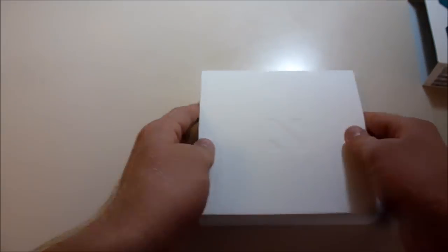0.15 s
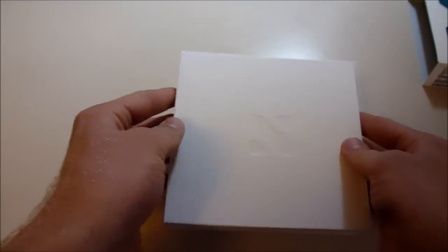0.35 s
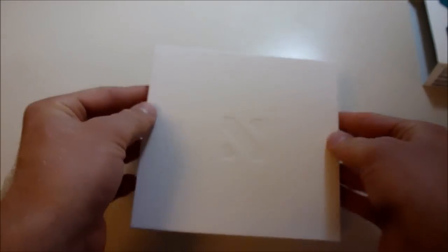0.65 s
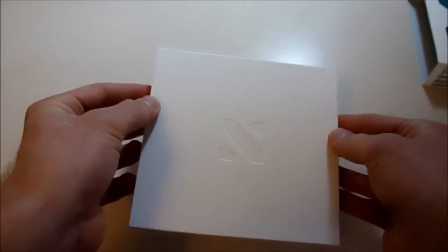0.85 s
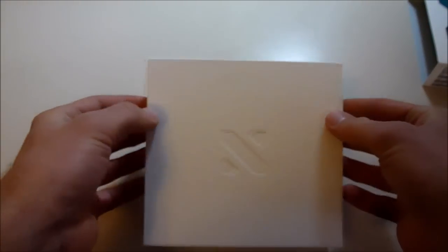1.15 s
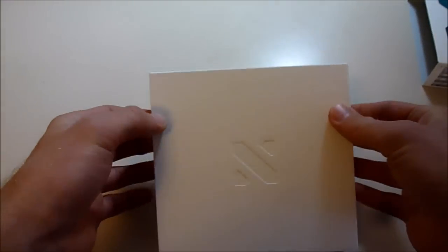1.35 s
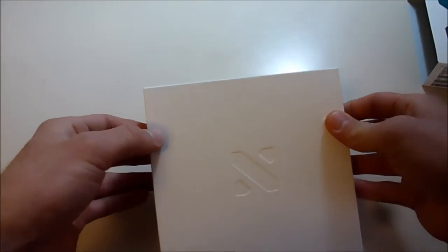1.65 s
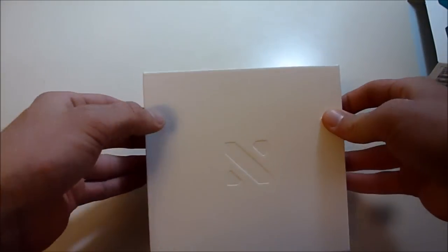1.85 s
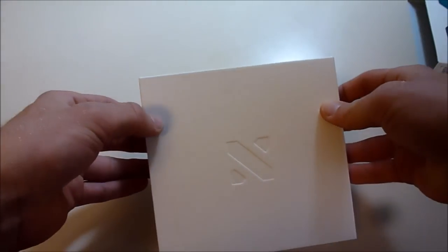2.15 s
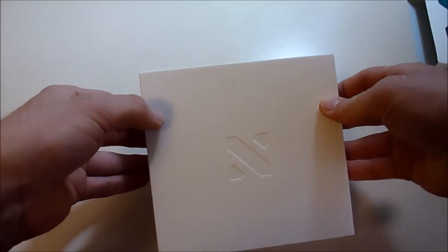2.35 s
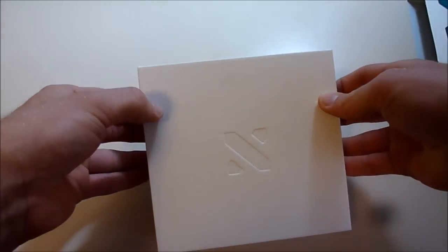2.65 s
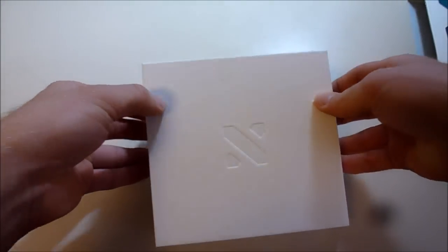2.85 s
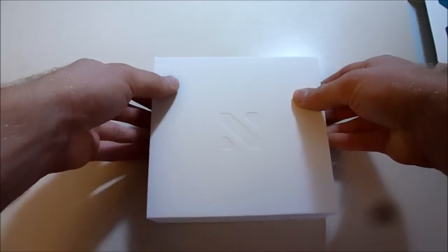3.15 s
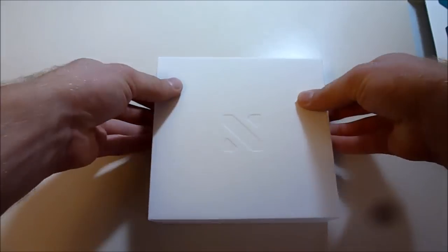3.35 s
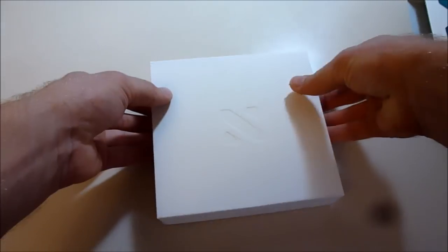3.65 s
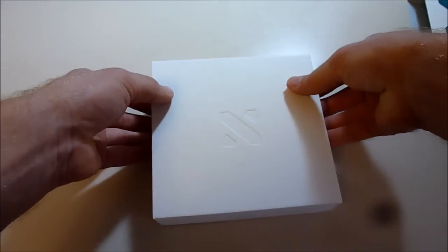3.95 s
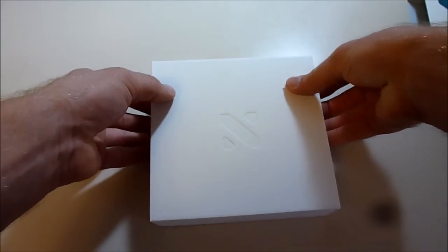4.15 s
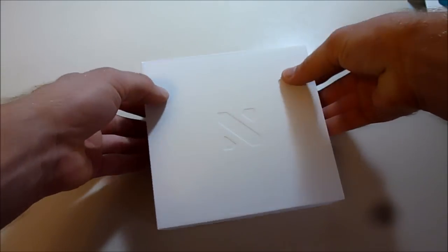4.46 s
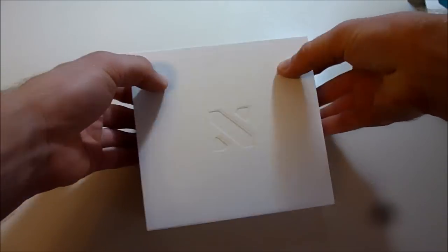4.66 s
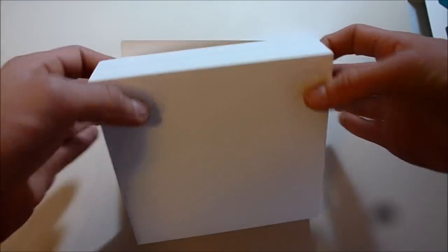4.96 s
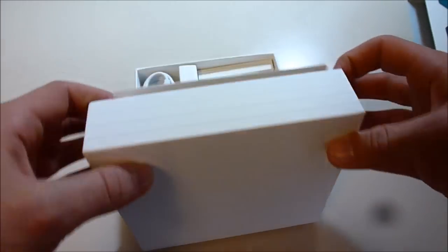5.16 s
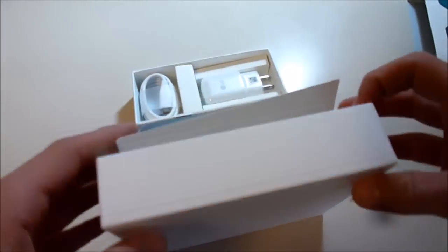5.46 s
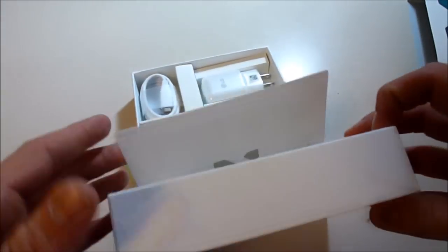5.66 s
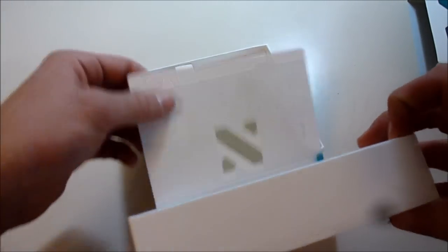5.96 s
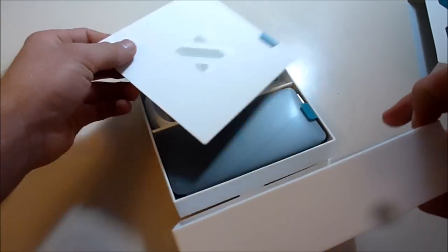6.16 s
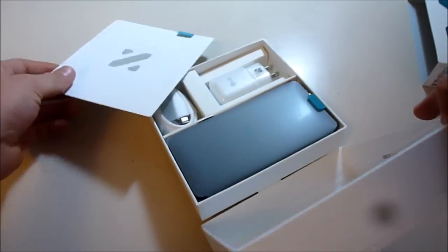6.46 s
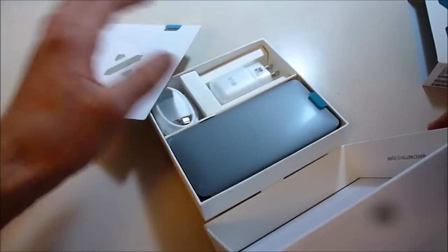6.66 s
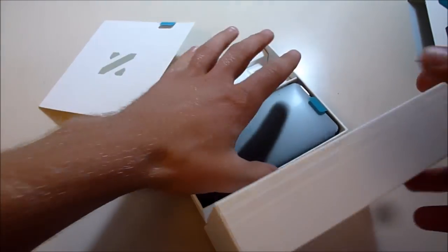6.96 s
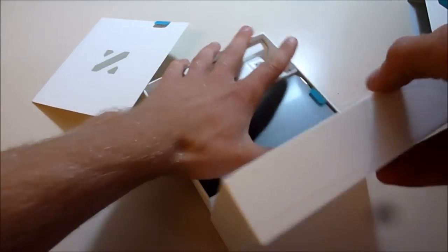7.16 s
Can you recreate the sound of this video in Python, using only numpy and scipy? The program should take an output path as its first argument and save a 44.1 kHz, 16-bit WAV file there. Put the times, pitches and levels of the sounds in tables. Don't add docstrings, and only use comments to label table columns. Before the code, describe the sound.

A snug cardboard box lid is worked loose by hand, with hollow knocks, dry scrapes and one loud crack, then light card ticks and brushing.

```python
import sys
import numpy as np
from scipy import signal
from scipy.fft import rfft, irfft
from scipy.io import wavfile
from scipy.ndimage import uniform_filter1d

SR = 44100
rng = np.random.default_rng(int(sys.argv[2]) if len(sys.argv) > 2 else 0)


def volts_from_decibels(level):
    exponent = np.asarray(level, float) / 20
    return 10 ** exponent


def wrap_up_sound(samples):
    columns = np.atleast_2d(samples).T
    tamed = np.clip(columns, -1, 1)
    steps = np.round(tamed * 32767).astype(np.int16)
    wavfile.write(sys.argv[1], SR, steps)


N = 321930


def level(x, db):
    return x * volts_from_decibels(db) / np.sqrt(np.mean(x ** 2) + 1e-18)


def band(x, lo_hz, hi_hz, order=2):
    return signal.sosfilt(signal.butter(order, [lo_hz, hi_hz], "band", fs=SR, output="sos"), x)


def colour(x, points):
    hz, db = np.transpose(points)
    f = np.arange(len(x) // 2 + 1) * SR / len(x) + 1
    gain_db = np.interp(np.log(f), np.log(hz), db)
    return irfft(rfft(x) * volts_from_decibels(gain_db), len(x))


def ring(x, modes, damp=0.89, stretch=0.96, boost_db=0.):
    stretches = stretch * np.ones(len(modes))
    boosts_db = boost_db + np.zeros(len(modes))
    out = 0
    for k, ((hz, width, db), s, b) in enumerate(zip(modes, stretches, boosts_db)):
        r = np.exp(-np.pi * width * damp / SR)
        swing = [1, -2 * r * np.cos(2 * np.pi * hz * s / SR), r * r]
        out = out + (-1) ** k * volts_from_decibels(db + b) * signal.lfilter([1 - r, 0, r - 1], swing, x)
    return out


def walk(rate):
    k = int(SR / rate)
    held = np.repeat(rng.standard_normal(N // k + 1), k)
    steps = uniform_filter1d(uniform_filter1d(held, k), k)[:N]
    return steps / steps.std()


def slips(rate, spread_db):
    chance, sign = rng.random(N), rng.standard_normal(N)
    size_db = spread_db * np.minimum(rng.exponential(size=N), 3)
    return (chance < rate / SR) * np.sign(sign) * volts_from_decibels(size_db)


# (frequency [Hz], level [dB per Hz])
AIR = [(35, -45), (60, -11), (349, 12.5), (768, -23.5), (940, 14.5), (1330, -13), (4840, -10.5),
       (6420, -20.5), (7550, -43.5), (9820, -81), (16600, -120)]


def still_air():
    return level(colour(rng.standard_normal(N), AIR), -54.5)


def room(x):
    t60_s, tail_db, top_hz = 0.11, -15, 2800
    t = np.arange(int(.4 * SR)) / SR
    noise = band(rng.standard_normal(len(t)), 70, top_hz, order=1)
    tail = noise * 1000 ** (-t / t60_s) * (t > .004)
    return signal.fftconvolve(x, tail / np.sqrt(np.sum(tail ** 2)))[:N] * volts_from_decibels(tail_db)


# (time [s], level [dB], centre [Hz], ring t60 [s])
CRACKS = [(0.1196, -23.5, 3010, 0.05), (0.1421, -18, 2840, 0.043), (0.4594, -28, 2230, 0.035),
          (0.6524, -33.5, 2660, 0.048), (0.764, -28.5, 4050, 0.056), (1.042, -32, 3960, 0.046),
          (1.252, -33, 3320, 0.036), (1.4043, -33, 2500, 0.036), (2.319, -29, 2490, 0.029),
          (2.8755, -32.5, 2600, 0.04), (3.0689, -27, 2660, 0.048), (3.132, -29.5, 2480, 0.04),
          (3.184, -22.5, 2950, 0.028), (3.267, -32, 3180, 0.058), (3.335, -34.5, 3180, 0.048),
          (3.3896, -33, 2600, 0.036), (3.46, -27, 3110, 0.033), (3.5074, -20.5, 3120, 0.049),
          (3.5346, -18.5, 3250, 0.047), (3.7863, -29.5, 3430, 0.028), (4.1724, -32.5, 2900, 0.033),
          (4.1852, -34.5, 3120, 0.044), (4.2106, -23.5, 2200, 0.035), (4.2693, -28, 2560, 0.03),
          (4.3233, -27.5, 2610, 0.035), (4.4792, -17, 2640, 0.04), (4.5144, -4.5, 2280, 0.022),
          (4.571, -21, 3280, 0.04), (4.5883, -15, 2530, 0.033), (4.6854, -13.5, 2330, 0.051),
          (4.811, -22.5, 2590, 0.073), (4.8998, -31, 2510, 0.04), (4.9254, -22.5, 2200, 0.03),
          (5.1467, -27.5, 2420, 0.027), (5.5987, -28.5, 2870, 0.04), (5.7094, -27, 2930, 0.035),
          (5.7688, -29, 2470, 0.062), (5.9383, -27, 2600, 0.054), (5.9655, -23.5, 3160, 0.026),
          (5.9854, -15, 2710, 0.062), (6.263, -14, 2600, 0.05), (6.3923, -32, 3730, 0.049),
          (6.4606, -27, 4200, 0.068), (6.5933, -19.5, 2330, 0.027), (6.665, -25.5, 2410, 0.04),
          (6.6802, -19, 3150, 0.04), (6.8575, -36, 2320, 0.036), (6.981, -34, 2200, 0.056)]
# (time [s], level [dB], centre [Hz], ring t60 [s])
REBOUNDS = [(.117, -27, 850, 0.063), (0.15, -24.5, 1324, 0.074), (0.248, -27, 328, .07),
            (0.29, -41, 3130, 0.026), (1.155, -30, 412, 0.073), (1.248, -36, 210, .1),
            (1.396, -32.5, 566, 0.025), (1.419, -19.5, 550, 0.04), (1.435, -27.5, 790, .04),
            (5.147, -34.5, 3550, 0.021), (1.86, -38, 496, 0.13), (2.075, -39, 500, 0.12),
            (2.14, -34, 514, 0.105), (2.37, -40, 520, 0.053), (2.56, -36.5, 530, 0.073),
            (4.199, -42, 1000, .02), (3.075, -34, 430, .15), (4.33, -41, 556, .15),
            (4.843, -31.5, 950, 0.043), (4.606, -15.5, 550, 0.075), (5.157, -33.5, 640, .08),
            (5.43, -46, 182, .1), (5.607, -31.5, 346, .08), (5.712, -34.5, 1610, .08),
            (5.865, -33, 1610, 0.036), (5.87, -41.5, 375, .1), (6.275, -26, 744, 0.051),
            (6.475, -36, 4100, 0.14), (6.599, -28, 1640, 0.092), (0.2053, -38.5, 5470, 0.0099),
            (.78, -30, 505, .08), (.855, -34.5, 1000, 0.076), (3.1, -39, 430, 0.097), (3.7, -31, 570, .08),
            (4.225, -31, 340, 0.05), (4.645, -28, 560, .06), (.717, -32, 1900, .05), (.832, -30, 900, .02),
            (1.418, -32.5, 2800, .06), (3.135, -23, 400, .06), (6.03, -30.5, 398, 0.075),
            (4.872, -36, 1000, .03), (1.5, -46, 171, .15)]


def fibres():
    out, t = np.zeros(N + 8192), np.arange(8192) / SR
    rows = [(s, db - 7, hz, t60, 0.2, .0002) for s, db, hz, t60 in CRACKS]
    rows += [(*row, 0.13, .002) for row in REBOUNDS]
    for (s, db, hz, t60, width, rise_s), noise in zip(rows, rng.standard_normal((len(rows), 8192))):
        push = noise * 1000 ** (-t / max(t60, .005)) * (1 - np.exp(-t / rise_s))
        burst = ring(push, [(hz, width * hz, 0)], 0.7, 0.98)
        burst = band(burst, hz / 3, min(1.8 * hz, 7000), order=1)
        loudest = np.sqrt(2 * uniform_filter1d(burst ** 2, size=132).max())
        i = int(s * SR)
        out[i:i + 8192] += burst * volts_from_decibels(db) / loudest
    return out[:N]


# (fastest moment [s], level [dB], speeding up [s], slowing [s])
SLIDES = [(.28, -36, 0.05, 0.013), (.65, -42.5, .3, 0.44), (.926, -31, 0.27, 0.074),
          (1.153, -32, .25, 0.054), (1.267, -38, 0.061, 0.084), (1.441, -22, 0.043, 0.05),
          (1.51, -34.5, 0.052, 0.072), (1.87, -38.5, 0.2, 0.32), (2.089, -33.5, 0.072, 0.15),
          (2.428, -34.5, 0.32, 0.24), (2.54, -42, 0.18, 0.043), (2.654, -32.5, .06, 0.093),
          (2.78, -34.5, 0.08, 0.14), (2.861, -40.5, 0.11, .22), (3.11, -43, .2, .05),
          (3.178, -26.5, 0.057, 0.06), (3.332, -37.5, 0.014, 0.082), (3.498, -31, 0.038, 0.18),
          (3.666, -23.5, 0.014, 0.079), (3.757, -48, .08, .13), (4.334, -28, 0.067, 0.34),
          (4.456, -29, 0.062, 0.2), (4.731, -26.5, 0.4, 0.061), (4.909, -23.5, 0.025, 0.043),
          (5.19, -53, 0.12, 0.033), (5.428, -47, 0.042, 0.1), (5.633, -49, 0.079, 0.3),
          (6.04, -32.5, 0.069, 0.027), (6.26, -40, 0.12, 0.28)]
# (fastest moment [s], level [dB], speeding up [s], slowing [s])
SCRAPES = [(.132, -24.5, 0.017, 0.083), (.2, -38, 0.033, 0.052), (.926, -38.5, 0.14, 0.075),
           (2.861, -44, 0.043, 0.2), (3.533, -33, 0.031, 0.088), (3.606, -25, 0.068, 0.025),
           (4.206, -37.5, 0.021, .25), (4.424, -28.5, 0.095, .05), (4.495, -25.5, 0.0099, 0.054),
           (4.6, -31, 0.15, 0.34), (4.809, -40.5, .1, 0.1), (4.94, -19.5, 0.011, .03),
           (4.975, -32, 0.023, 0.09), (5.4, -45.5, 0.15, 0.087), (5.75, -44, 0.19, 1),
           (6.024, -33, 0.023, .02), (6.272, -34, 0.019, 0.059), (6.374, -55, 0.12, 0.27),
           (6.62, -37.5, 0.092, 0.033), (6.698, -33, 0.029, 0.054), (6.73, -46.5, 0.022, 0.31),
           (7.06, -44.5, 0.21, 1)]
# (fastest moment [s], level [dB], speeding up [s], slowing [s])
BRUSHES = [(.003, -36.5, 0.13, 0.19), (.29, -47, 0.51, 0.89), (.7, -45.5, 0.14, 0.11),
           (.865, -41, 0.046, .06), (1.415, -40, 0.018, 0.046), (1.644, -52.5, 0.26, 0.062),
           (1.87, -48.5, 0.055, 0.1), (3.56, -28.5, 0.021, 0.094), (4.225, -43, 0.024, 0.028),
           (4.38, -42.5, 0.056, .05), (4.7, -38, .03, 0.099), (5.05, -42, 0.3, 0.11),
           (5.3, -46, 0.011, .05), (5.4, -42, 0.052, 0.036), (5.633, -54, .17, .2),
           (6.0, -27.5, 0.034, 0.043), (6.29, -34.5, 0.043, 0.034), (6.395, -38, 0.0049, .04),
           (6.422, -33.5, 0.018, 0.02), (6.46, -42, 0.0054, .04), (6.477, -36, 0.035, 0.12),
           (6.579, -40.5, .05, 0.045), (6.698, -34, 0.032, 0.027), (6.88, -42.5, 0.016, 0.018),
           (7.12, -41.5, 0.035, 0.059), (7.29, -40.5, 1, 0.22)]


def strokes(t):
    # (panel [dB], edge [dB], hiss [dB])
    slide, scrape, brush, grip = (0, -11, -17), (-4, 0, -9.5), (-9.5, -14, 0), (-66, -57.5, -53)
    pause_db = -4 * ((t > 3.83) & (t < 4.165))
    power = volts_from_decibels(np.array(grip)[:, None] + pause_db) ** 2
    for rows, shares_db in [(SLIDES, slide), (SCRAPES, scrape), (BRUSHES, brush)]:
        speed = 0
        for s, db, rise, fall in rows:
            away = np.maximum((s - t) / rise, (t - s) / fall)
            speed = speed + volts_from_decibels(db - 15 * away) ** 2
        power = power + volts_from_decibels(np.array(shares_db))[:, None] ** 2 * speed
    return 10 * np.log10(power)


def easing(t, dip_db=-2.0, hold_s=0.15):
    onsets = [s for s, *_, rattle_db in blows() if rattle_db < -4.5]
    onsets = np.array(onsets + [t[-1] + 1])
    until = onsets[np.searchsorted(onsets, t)] - t
    return volts_from_decibels(dip_db * np.exp(-until / hold_s))


# (frequency [Hz], width [Hz], level [dB])
PANEL = [(230, 340, -15), (294.7, 138, 2), (348.2, 37.8, 6), (490, 90, -4), (566, 17, 0.5),
         (754, 250, -10.5)]
# (frequency [Hz], width [Hz], level [dB])
EDGE = [(862, 203, -7.5), (980.4, 93.4, 6), (1080, 153, 4.5), (1200, 167, 1.5), (1460, 117, 3),
        (1553, 302, 1), (2090, 1300, -13.5)]
# (frequency [Hz], width [Hz], level [dB])
RIM = [(2110, 120, -12), (2870, 100, 2), (2870, 240, -0.5), (3640, 69, 7.5), (4140, 240, -7.5),
       (4690, 160, 4), (5420, 89, -13)]
# (frequency [Hz], level [dB per Hz])
HISS = [(880, 1), (1500, 3), (2220, 1), (2590, 2.5), (3760, -1.5), (4670, -7), (5280, -7), (6460, -16),
        (7550, -14), (9820, -40.5), (16600, -120)]


def rubbing():
    t = np.arange(N) / SR
    coarse = t[::44]
    panel_db, edge_db, hiss_db = (np.interp(t, coarse, c) for c in strokes(coarse))
    pressure = walk(30)
    drive = slips(900, 3.0) * volts_from_decibels(2.4 * pressure)
    bend = .5 + .5 * np.tanh(4.3 * uniform_filter1d(pressure[::-1], size=2000))

    def bent(x, modes, damp, db=0.):
        return ring(x * bend, modes, damp, 0.9276, db) + ring(x * (1 - bend), modes, damp, 0.96, db)

    side_walls_db = np.array([-10.5, -12.5, -10.5, -2.5, 1.5, -2])
    panel = level(band(bent(drive, PANEL, 0.96, side_walls_db), 200, 990), -0.84)

    scratch = drive + slips(1500, 3.7)
    hollow_db = np.where(t > 5.03, -1, -8)
    hollow = level(ring(scratch, [(945, 45, 0)]), 0) * volts_from_decibels(2 * walk(12) + hollow_db)
    edge = level(band(bent(scratch, EDGE, 1.64), 560, 2000), -0.12) * volts_from_decibels(walk(50)) + hollow

    skin = level(slips(2500, 3.0), 0) + rng.standard_normal(N)
    hiss = level(band(colour(skin, HISS), 700, 9500), -3)
    hiss = hiss + level(band(bent(skin, RIM, 1.3), 1800, 6500), -8)
    rasp = hiss * volts_from_decibels(hiss_db + 1.6 * pressure + 1.5 * walk(70))
    return easing(t) * (panel * volts_from_decibels(panel_db) + edge * volts_from_decibels(edge_db) + rasp)


# (time [s], peak level [dB], centre [Hz], width [Hz])
STRIKES = [
    (0.1411, -4.5, 1266, 350),
    (1.043, -16, 900, 400),
    (1.4053, -7, 740, 350),
    (3.556, -9, 800, 400),
    (4.5133, -2.5, 1260, 500),
    (4.927, -9.5, 900, 400),
    (6.594, -20, 1600, 800),
    (6.681, -20, 1800, 900),
]


def strikes():
    out, tap = np.zeros(N), np.arange(1024) == 0
    for s, db, hz, width in STRIKES:
        shock = band(ring(1. * tap, [(hz, width, 0)], 0.85, 0.96), 150, 2.4 * hz)
        i = int(s * SR)
        out[i:i + 1024] -= shock * volts_from_decibels(db) / np.abs(shock).max()
    return out


# (time [s], struck spot [Hz], level [dB], edge over panel [dB])
THUDS = [(.143, 1645, -13, 10), (.634, 815, -34, 15), (1.02, 677, -30.5, -2), (1.044, 314, -16.5, -3.5),
         (1.133, 590, -32, 2), (1.406, 542, -14.5, -3), (1.447, 566, -23, -20), (1.514, 685, -33.5, 2),
         (1.975, 530, -35, 4), (2.171, 910, -38, 15), (2.368, 530, -42, -24), (2.528, 575, -33.5, -10),
         (2.639, 552, -29, -17), (2.742, 533, -38, -1), (2.853, 558, -31, -8), (2.877, 935, -25.5, 3),
         (3.557, 518, -12, -6), (5.039, 1064, -23.5, 30), (3.669, 450, -26.5, -24), (4.615, 553, -17, -18),
         (4.694, 782.5, -14.5, 4.5), (4.842, 950, -25.5, 5), (5.116, 1010, -35.5, 18),
         (6.195, 326, -40, -2), (6.665, 1210, -32, 4), (6.86, 977, -30.5, 3), (7.123, 1460, -34, 12)]
# (time [s], struck spot [Hz], level [dB], edge over panel [dB])
TAPS = [(.123, 690, -26, -5.5), (4.48, 1480, -24.5, 16.5), (.241, 308, -28.5, -6), (.715, 790, -43.5, 5),
        (.838, 527, -19, -7), (.871, 567, -28, 7), (.899, 490, -19.5, -5), (.926, 820, -24.5, -27),
        (.99, 473, -34, -1), (1.074, 487, -30, 6.5), (1.315, 490, -33.5, -5), (2.321, 560, -30.5, 4.5),
        (2.61, 497, -36, -6), (3.024, 960, -35, -3), (3.131, 703, -13, -7.5), (3.323, 694, -33.5, -33),
        (3.336, 783, -33.5, 1.5), (3.391, 550, -32, 2), (3.925, 560, -33, -8), (4.021, 1174, -39.5, 2.5),
        (4.212, 490, -17.5, -8), (4.249, 457, -27, 8), (4.39, 990, -27, 7), (4.489, 1560, -20, 16),
        (4.588, 524, -12.5, -6), (4.684, 425, -11.5, -1), (4.927, 574, -12, -1), (5.359, 926, -30.5, 26),
        (5.603, 935, -23.5, 15)]
# (time [s], struck spot [Hz], level [dB], edge over panel [dB])
SNAPS = [(.46, 1043, -34, 8), (.569, 335, -42.5, 4), (.653, 483, -32, -1), (.723, 860, -31.5, 22),
         (.761, 484, -17.5, -10.5), (1.247, 378, -24.5, -14), (3.068, 390, -32, -6),
         (3.185, 1090, -30.5, 15), (3.269, 1080, -42.5, 0), (3.462, 1080, -33, -1),
         (3.508, 1020, -24.5, -4), (3.535, 1620, -26, 2.5), (3.58, 1040, -24.5, 8),
         (3.655, 930, -22.5, -7.5), (3.789, 1080, -37.5, -0.5), (4.173, 956, -39.5, 13),
         (4.187, 996, -35, 9), (4.27, 521, -24, -8), (4.324, 980, -29.5, 3.5), (4.358, 516, -29.5, 16),
         (4.444, 523, -29.5, -1), (4.48, 563, -25, -7.5), (4.514, 567, -8.5, -7.5), (4.571, 726, -30, 22),
         (4.812, 358, -28, 3.5), (4.9, 566, -35.5, -6)]
# (time [s], struck spot [Hz], level [dB], edge over panel [dB])
TICKS = [(5.147, 970, -32.5, 2.5), (5.229, 980, -55, 7), (5.419, 363, -31, -16), (5.545, 950, -41.5, -1),
         (5.689, 1200, -50, 26), (5.709, 977, -34.5, 5), (5.769, 966, -30.5, 33), (5.832, 940, -44, 3),
         (5.937, 840, -39.5, 25), (5.966, 1560, -41.5, -3), (5.986, 1690, -27.5, 14),
         (6.007, 1065, -24.5, 6), (6.257, 830, -23, 16.5), (6.265, 678, -27, -1), (6.39, 905, -35, 9),
         (6.461, 925, -40, 16), (6.566, 1550, -41, 31), (6.594, 1240, -27.5, 2), (6.681, 1330, -26.5, 11),
         (6.982, 1460, -32.5, 9), (7.029, 1330, -52, 12), (7.157, 1020, -38, 24), (7.278, 950, -34, 20)]


def blows():
    # (crack over edge [dB], rattle after a middling -28 dB blow [dB])
    thud, tap, snap, tick = (-16.5, -9.5), (-10, -7.5), (-3, -8.5), (-3, -10)
    out = []
    for rows, (crack_db, rattle_db) in [(THUDS, thud), (TAPS, tap), (SNAPS, snap), (TICKS, tick)]:
        for s, hz, db, over in rows:
            panel_db, edge_db = db - max(over, 0), db + min(over, 0)
            out.append((s, hz, panel_db, edge_db, edge_db + crack_db, rattle_db - 0.27 * (db + 28)))
    return sorted(out)


def knocks():
    out, t = np.zeros(N + 8192), np.arange(8192) / SR
    push = t / .0001 * np.exp(-t / .0001)
    chance = rng.standard_normal((len(blows()), 8192 + 16))
    for (s, hz, panel_db, edge_db, crack_db, rattle_db), c in zip(blows(), chance):
        noise, detune = c[:8192], 1 + .018 * c[8192:]
        grit = noise[::-1] * volts_from_decibels(2.0 * np.repeat(noise[:64], 128))
        rattle = volts_from_decibels(min(rattle_db, -3)) * grit * np.exp(-t / 0.039) * (1 - np.exp(-t / 0.0005))
        chatter = noise * np.exp(-t / 0.0026) * (1 - np.exp(-t / 0.00096))
        sharpness = 5 * volts_from_decibels(max(-rattle_db - 12, 0))
        blow = sharpness * push + chatter + .45 * rattle

        def near(modes):
            return -12 * np.abs(np.log2(np.array(modes)[:, 0] / hz))

        spot = ring(blow, [(hz, 35 + hz / 25, 6)])
        panel = ring(blow, PANEL, 1.14, detune[:len(PANEL)], near(PANEL))
        panel = band(panel + 0.83 * spot * (hz < 780), 71, 1100)
        edge = ring(blow, EDGE, 1.58, detune[-len(EDGE):], 0.88 * near(EDGE))
        edge = band(edge + spot * (hz >= 780), 710, 2300)
        snap = 3.5 * push + chatter + .5 * rattle
        rim = ring(snap, RIM, 6., detune[:len(RIM)] ** 3, 2.3 * noise[:len(RIM)])
        crack = band(0.86 * snap + .6 * rim, 1700, 4200)
        i = int(s * SR)
        for part, db, window in [(panel, panel_db, 176), (edge, edge_db, 110), (crack, crack_db, 66)]:
            out[i:i + 8192] += part * volts_from_decibels(db) / np.sqrt(uniform_filter1d(part ** 2, window).max())
    return out[:N]


def scene():
    box = knocks() + strikes() + rubbing()
    return (box + room(box) + still_air() + fibres())[None]


# (time [s], length [s], tones kept up to [Hz])
GAPS = [(.16, .018, 4200), (.42, .008, 6000), (.551, .01, 5600), (1.535, .008, 6500), (1.803, .013, 2000),
        (2.302, .01, 3400), (2.684, .01, 6500), (2.891, .014, 2900), (2.981, .01, 4500),
        (3.604, .006, 4600), (3.816, .006, 4000), (4.966, .01, 3400), (5.33, .011, 4400),
        (5.367, .011, 4800), (6.007, .012, 5100), (6.546, .012, 4700)]


def lost_frames(x):
    out = x.copy()
    for s, length, keep_hz in GAPS:
        i, n = int((s - .006) * SR), int((length + .012) * SR)
        lines, f = rfft(x[i:i + n]), np.arange(n // 2 + 1) * SR / n
        strong = np.abs(lines) > 1.55 * uniform_filter1d(np.abs(lines), size=21)
        change = np.where(strong, .5, -.9)
        change = np.where(f < 1400, 0, change)
        change = np.where(f > keep_hz, -.85, change)
        out[i:i + n] += irfft(lines * change, n) * signal.windows.tukey(n, .5)
    return out


def roll_off(x):
    return signal.sosfilt(signal.butter(12, 7700, fs=SR, output="sos"), x)


def record(dry):
    x = signal.sosfilt(signal.butter(1, 207, "high", fs=SR, output="sos"), dry[0])
    x = x + level(band(rng.standard_normal(N), 4500, 9000), -69.5)
    x = signal.sosfilt(signal.butter(16, 6706, fs=SR, output="sos"), lost_frames(x))
    return roll_off(np.clip(x, -.98, .98)[None])


dry = scene()
out = record(dry)
wrap_up_sound(out)
```